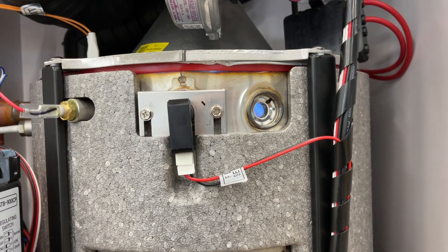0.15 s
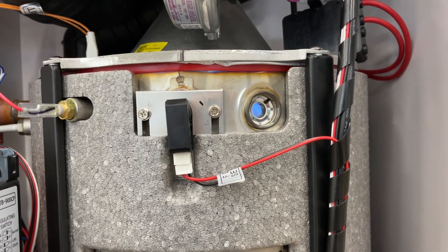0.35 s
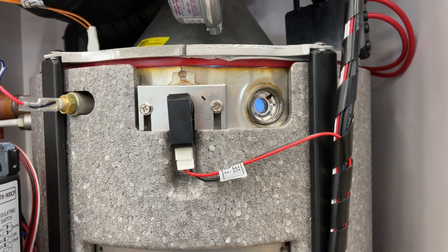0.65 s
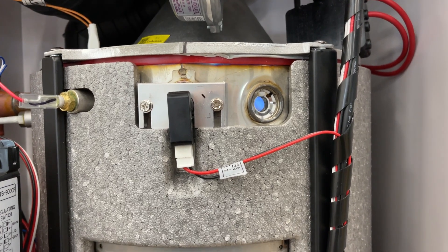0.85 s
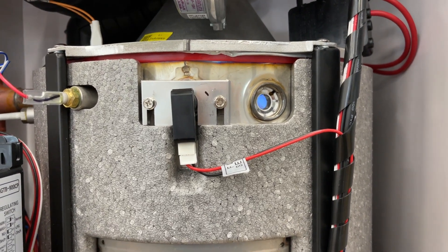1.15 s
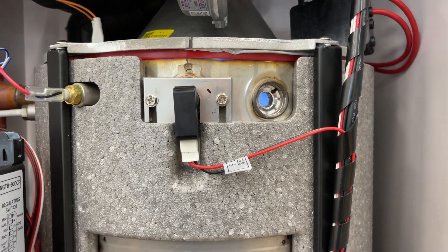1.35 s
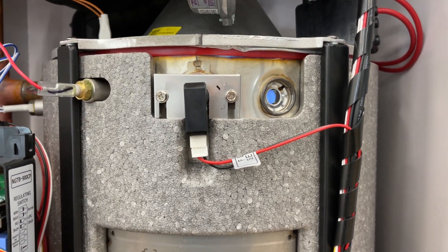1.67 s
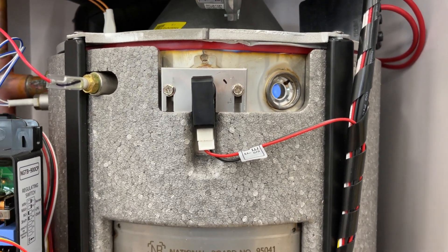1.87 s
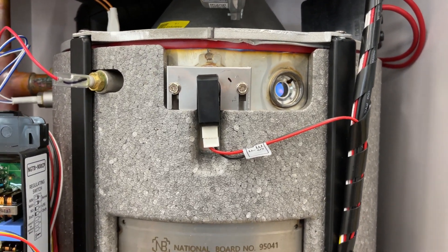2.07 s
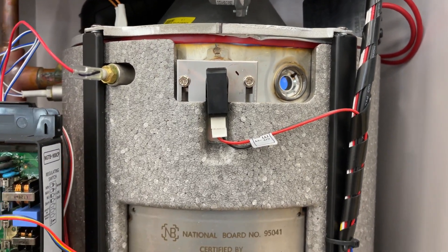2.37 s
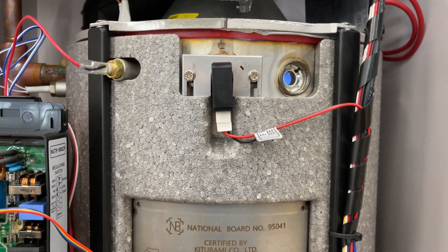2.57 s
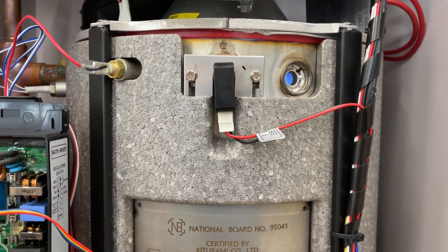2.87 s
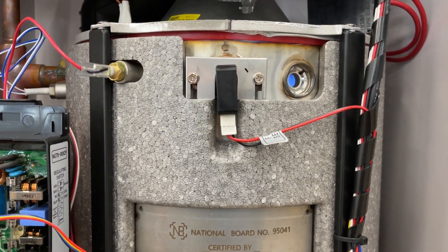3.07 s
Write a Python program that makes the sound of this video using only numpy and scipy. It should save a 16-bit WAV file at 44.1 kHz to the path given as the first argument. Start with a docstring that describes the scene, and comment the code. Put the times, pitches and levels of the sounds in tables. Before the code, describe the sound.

A boiler burner drones unsteadily at close range, its blower hissing, with a few light handling knocks

```python
"""A low flame rumble and one wavering chamber hum, which swells and sags, fill a small room.
They come from a gas boiler with its cover off, close to a hand-held camera.
The blower adds shaped noise for rushing air, ringing casing and hiss, and sines for faint shaft tones.
A few soft handling bumps, a dull nudge and light rubs pass: noise under short envelopes."""
import sys
import numpy as np
from scipy.fft import rfft, irfft, next_fast_len
from scipy.io import wavfile
from scipy.ndimage import map_coordinates

SR = 44100
rng = np.random.default_rng(int(sys.argv[2]) if len(sys.argv) > 2 else 0)


def to_wav(sig):
    """Store sig (one row per channel, or 1-D mono) as 16-bit WAV at the path in sys.argv[1].

    Samples outside -1..1 are clipped; the rate is SR.
    """
    pcm = np.clip(np.atleast_2d(sig), -1, 1) * 32767
    pcm = np.round(pcm).astype(np.int16)
    wavfile.write(sys.argv[1], SR, pcm.T)  # frames by channels


N = 142002
TIME = np.arange(N) / SR  # seconds


def amp(db):
    """Decibels to gain."""
    return 10 ** (np.asarray(db) / 20)


def unit(x):
    """Scale to rms 1."""
    return x / np.sqrt(np.mean(x ** 2) + 1e-20)


def along(points, hz):
    """Read a curve of (Hz, value) points, interpolated on a log frequency axis."""
    f, v = np.transpose(points)
    return np.interp(np.log(hz + 1), np.log(f + 1), v)


def wobble(rate):
    """A smooth random curve through normal-distributed knots, rate knots a second."""
    knots = rng.standard_normal(int(N * rate / SR) + 4)
    return map_coordinates(knots, [np.arange(N) * rate / SR])


def filtered(x, response):
    """Filter x by a real or complex response of frequency, padded so that tails do not wrap round."""
    m = next_fast_len(N + SR // 2)
    return irfft(rfft(x, m) * response(np.fft.rfftfreq(m, 1 / SR)), m)[..., :N]


def noise(gain):
    """Stereo noise of rms 1, coloured by gain; the room's spread makes the ports less alike at some pitches."""
    # Likeness of the two ports. Each row: frequency in Hz, correlation from 0 to 1.
    alike = [(60, 0.96), (220, 1), (500, 0.91), (1200, 0.71), (3000, 0.83), (6000, 0.52)]

    def mid_side_gain(hz):
        angle = np.arccos(np.clip(along(alike, hz), -1, 1)) / 2
        return gain(hz) * np.array([np.cos(angle), np.sin(angle)])

    mid, side = filtered(rng.standard_normal((2, N)), mid_side_gain)
    return unit(np.array([mid + side, mid - side]))


def near_noise(colour, tilt_db=0):
    """Mono noise of rms 1 with the given spectrum, tilted by tilt_db per octave."""
    def gain(hz):
        octaves = np.log2(np.maximum(hz, colour[0][0]))
        return amp(along(colour, hz) + tilt_db * octaves)

    return unit(filtered(rng.standard_normal(N), gain))


def resonances(rows, hz):
    """Gain of a set of steep-sided resonances, their powers added."""
    power = 0
    for centre, width, db in rows:
        offset = (hz - centre) / width * 2
        power = power + amp(db) ** 2 / width / (1 + offset ** 2) ** 2
    return np.sqrt(power)


def tone(hz):
    """A sine of rms 1 that follows a pitch curve from a random starting phase."""
    return np.sqrt(2) * np.sin(2 * np.pi * (np.cumsum(hz) / SR + rng.random()))


def chamber_hum():
    """The flame drives one chamber resonance: a sine that swells and sags and strays most when it is weak."""
    # Swells and dips of the hum. Each row: time in seconds, level in dB before the overall trim.
    swells = [(0.04, -34), (0.136, -27.5), (0.171, -51), (0.19, -29), (0.255, -21), (0.31, -23.5),
              (0.435, -16.5), (0.515, -24), (0.545, -39), (0.625, -24), (0.66, -30.5), (0.703, -33.5),
              (0.72, -22.5), (0.81, -23), (0.86, -34), (0.92, -23), (0.954, -37), (0.985, -24), (1.05, -22),
              (1.07, -30.5), (1.1, -24), (1.16, -23.5), (1.185, -48), (1.215, -25.5), (1.25, -23.5),
              (1.27, -28.5), (1.298, -20), (1.39, -29.5), (1.495, -25), (1.522, -18.5), (1.548, -35.5),
              (1.575, -24.5), (1.685, -19), (1.728, -46), (1.75, -24), (1.785, -24), (1.825, -51),
              (1.885, -21.5), (1.912, -30.5), (1.945, -19), (1.98, -28), (2.03, -21.5), (2.08, -22),
              (2.113, -33), (2.148, -21.5), (2.251, -35.5), (2.31, -18), (2.38, -20), (2.403, -18.5),
              (2.463, -39.5), (2.52, -28), (2.69, -22), (2.728, -50), (2.77, -23.5), (2.825, -20),
              (2.848, -28.5), (2.925, -33), (2.99, -22.5), (3.011, -47), (3.04, -25), (3.082, -57),
              (3.137, -19.5), (3.199, -37)]
    centre_hz, wander_hz, wander_rate = 222.95, 4.53, 40  # wander rate in knots a second
    trim_db, flutter_db = -0.5, 0.94
    s, db = np.transpose(swells)
    swell = np.interp(TIME, s, amp(db))
    weakness = np.sqrt(swell.mean() / swell)
    pitch = centre_hz + wander_hz * weakness * wobble(wander_rate)
    return swell * amp(trim_db + flutter_db * wobble(55)) * tone(pitch)


def flame_rumble():
    """The flame's broad low roar: steady stereo noise with a shaped spectrum."""
    # Colour of the rumble. Each row: frequency in Hz, relative density in dB per Hz.
    rumble_colour = [(26, -33), (36, -3.5), (55, -8), (76, -1), (145, -8.5), (175, 2.5), (200, 1.5),
                     (222, -4), (246, 7), (256, -7.5), (290, -7), (318, -15.5), (380, -44), (700, -68)]
    level_db = -36.5
    return amp(level_db) * noise(lambda hz: amp(along(rumble_colour, hz)))


def burner():
    """The flame's rumble and the chamber hum that it drives."""
    return chamber_hum() + flame_rumble()


def air_rush():
    """Air rushing through the blower: broad stereo noise whose level wavers slightly."""
    # Colour of the rush. Each row: frequency in Hz, relative density in dB per Hz.
    air_colour = [(150, -12), (350, -4), (480, -2), (600, -1), (780, 3), (860, -3.5), (1050, 1), (1500, -4),
                  (1850, -4.5), (2400, -6.5), (3250, -6), (4200, -12), (5500, -12), (7000, -18),
                  (9000, -14.5), (13000, -48)]
    level_db, waver_db, waver_rate = -43.5, 0.86, 13.0  # rate in knots a second
    return amp(level_db + waver_db * wobble(waver_rate)) * noise(lambda hz: amp(along(air_colour, hz)))


def casing_ring():
    """Casing resonances that the air excites: noise through a bank of narrow peaks."""
    # Casing modes. Each row: centre in Hz, width in Hz, level in dB.
    casing_modes = [(93, 12, -47), (431, 35, -58.5), (527, 35, -54), (678.3, 12, -60), (1210, 62, -50),
                    (1970, 30, -69.5), (2071, 44, -57), (2160, 80, -59), (2705, 50, -62), (5500, 57, -67),
                    (6460, 45, -66.5)]
    total_level = np.linalg.norm(amp([db for _, _, db in casing_modes]))
    return total_level * noise(lambda hz: resonances(casing_modes, hz))


def motor_tones():
    """Faint sines at shaft multiples, with mains hum and whines; all share one small pitch drift."""
    # Blower tones. Each row: multiple of the shaft rate, mid level in dB.
    orders = [(3, -50.5), (8, -76), (9, -63), (10, -63), (12, -65), (13, -54.5)]
    # Mains hum and thin motor whines. Each row: mid frequency in Hz, mid level in dB.
    whines = [(120, -53.5), (721, -68.5), (2099, -62.5)]
    shaft_hz, drift = 90.6, 0.00073  # drift as a fraction of the pitch
    flutter_db, flutter_rate = 3, 14  # rate in knots a second, drawn anew for each tone
    speed = 1 + drift * wobble(4.12)
    lines = [(k * shaft_hz, db) for k, db in orders] + list(whines)
    return sum(amp(db + flutter_db * wobble(flutter_rate)) * tone(hz * speed) for hz, db in lines)


def fine_hiss():
    """Steady treble hiss: one mono noise feeding both ports."""
    # Colour of the hiss. Each row: frequency in Hz, relative density in dB per Hz.
    hiss_colour = [(3000, -26), (6000, -3), (7300, -12), (8800, -1), (9400, 2), (10300, 7.5), (11200, 3.5),
                   (12000, -5), (12600, -12), (13000, -22)]
    level_db = -50
    return amp(level_db) * near_noise(hiss_colour)


def blower():
    """Rushing air, the casing that it rings, the motor's tones and fine hiss."""
    return air_rush() + casing_ring() + motor_tones() + fine_hiss()


def bumps():
    """Scuffing contacts on the camera: a sharp start, then a grainy, dying mix of ring and thud."""
    # Handling bumps. Each row: start in seconds, level in dB, time to fall 60 dB in seconds,
    # brightness in dB per octave, upper reach in Hz, ring over thud in dB.
    hits = [(1.31, -35.5, 0.14, 7.5, 2750, 2), (1.314, -37, 0.23, -4, 2600, 2),
            (1.326, -37.5, 0.16, 1.5, 2600, -2), (1.522, -40, 0.19, 1, 2700, -2),
            (2.168, -33, 0.046, 11, 4080, -7.5), (2.171, -32, 0.094, 8, 2100, -4)]
    # Modes that the bumps ring with. Each row: centre in Hz, width in Hz, relative level in dB.
    bump_modes = [(429, 29, 2), (499, 16, -3.5), (1320, 41, -2), (1600, 99, -8), (1976, 42, -5.5),
                  (2290, 49, -12.5), (2580, 68, -17), (3300, 120, -13), (3680, 380, -12)]
    # Colour of the thud. Each row: frequency in Hz, relative density in dB per Hz.
    thud_colour = [(200, -31), (450, 3), (2000, 1), (2900, -8), (3900, -11), (5000, -22)]
    attack_s, scuff_db, scuff_rate = 0.0018, 1, 220  # rate in knots a second
    out = np.zeros((2, N))
    for start, db, decay_s, bright_db, reach_hz, ring_db in hits:
        def contact(hz):
            tilt = amp(bright_db * np.log2(np.clip(hz, 300, 4000)))
            return tilt / np.sqrt(1 + (hz / reach_hz) ** 20)

        t = np.maximum(TIME - start, 0)
        ring = noise(lambda hz: resonances(bump_modes, hz) * contact(hz))
        thud = noise(lambda hz: amp(along(thud_colour, hz)) * contact(hz))
        envelope = (1 - np.exp(-t / attack_s)) * np.exp(-np.log(1000) * t / decay_s)
        grain = amp(db + scuff_db * wobble(scuff_rate))
        out += grain * envelope * (thud + amp(ring_db) * ring)
    return out


def nudge():
    """The hand shifts the camera: one soft, dull swell of noise without a ring."""
    # Colour of the nudge. Each row: frequency in Hz, relative density in dB per Hz.
    nudge_colour = [(30, -16), (80, 5), (140, -14), (350, -44), (750, -11), (1500, -60)]
    peak_s, spread_s, level_db = 2.135, 0.039, -36  # spread: from the peak down to 1/e
    swell = np.exp(-((TIME - peak_s) / spread_s) ** 2)
    return amp(level_db) * swell * near_noise(nudge_colour)


def rubs():
    """Brief light swishes of skin on the camera: treble noise under rounded strokes."""
    # Rubs. Each row: start in seconds, length in seconds, level in dB, brightness in dB per octave.
    strokes = [(0.446, 0.029, -48, -1), (2.183, 0.041, -52.5, 6), (2.22, 0.026, -47, -7),
               (2.47, 0.082, -53, 6), (2.526, 0.29, -52.5, 13), (2.987, 0.026, -50, 3)]
    # Colour of a rub before its tilt. Each row: frequency in Hz, relative density in dB per Hz.
    rub_colour = [(4000, -18), (6000, -1), (7300, 0), (8600, 8.5), (10000, 6), (12000, 1.5), (13000, -20)]
    out = np.zeros(N)
    for start, length, db, bright_db in strokes:
        progress = np.clip((TIME - start) / length, 0, 1)
        stroke = np.sqrt(np.abs(np.sin(np.pi * progress)))
        out += amp(db) * stroke * near_noise(rub_colour, bright_db)
    return out


def scene():
    """Boiler and handling together."""
    return burner() + blower() + bumps() + nudge() + rubs()


def record(dry):
    """Two ports that differ in level and phase; the sound opens after a moment, under a sharp treble limit."""
    # Level balance of the ports. Each row: frequency in Hz, left minus right in dB.
    balance = [(100, 0.4), (220, 0.6), (600, 0.9), (1200, 3), (2500, 2.5), (5000, 4), (8000, 3),
               (10000, -0.5)]
    # Phase between the ports. Each row: frequency in Hz, lead of the left in radians.
    lead = [(200, 0.16), (700, 0.52), (2100, 0.5), (2700, 1.02), (5000, .5), (6700, 0.4), (7600, 0.43),
            (8550, 0), (9300, -1.5), (10250, -3.5), (11000, -4.5), (11800, -5.5)]
    open_s, fade_s, top_hz = 0.035, 0.002, 12900
    sides = np.array([[0.5], [-0.5]])  # each port takes half of the difference

    def ports(hz):
        return amp(sides * along(balance, hz)) * np.exp(1j * sides * along(lead, hz))

    opening = np.clip((TIME - open_s) / fade_s, 0, 1)
    return filtered(opening * filtered(dry, ports), lambda hz: hz < top_hz)


dry = scene()
out = record(dry)
to_wav(out)
```